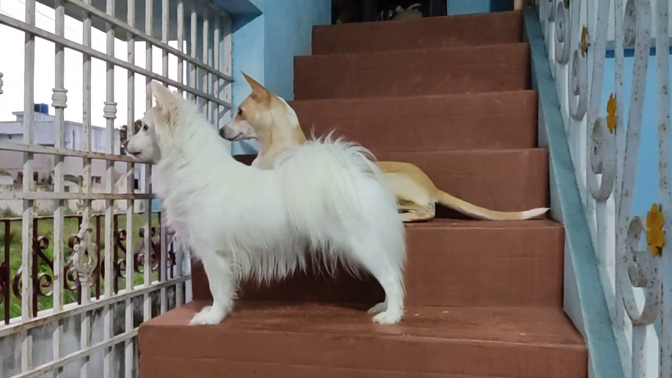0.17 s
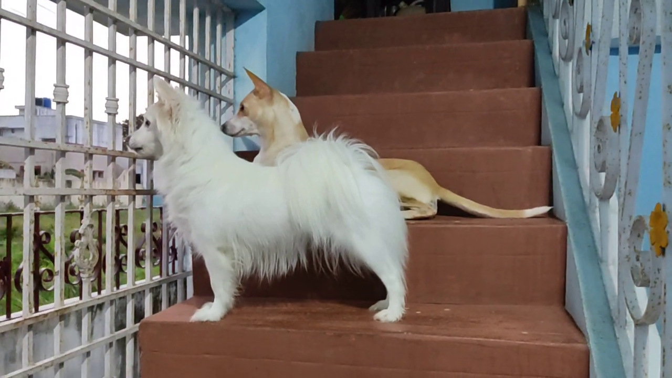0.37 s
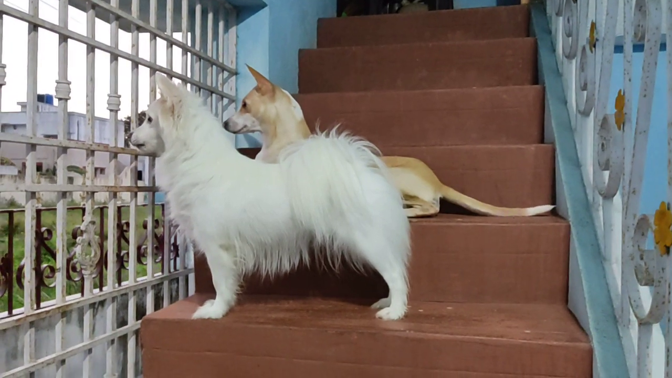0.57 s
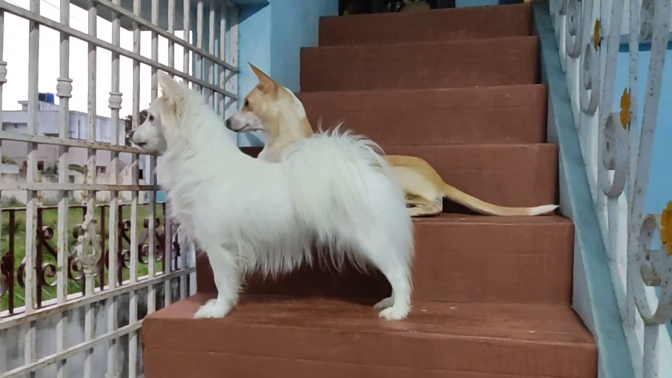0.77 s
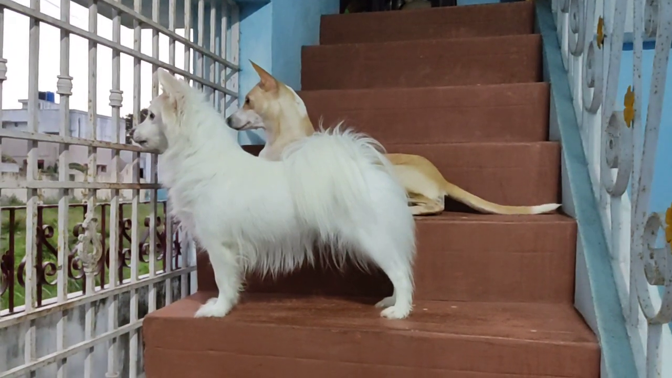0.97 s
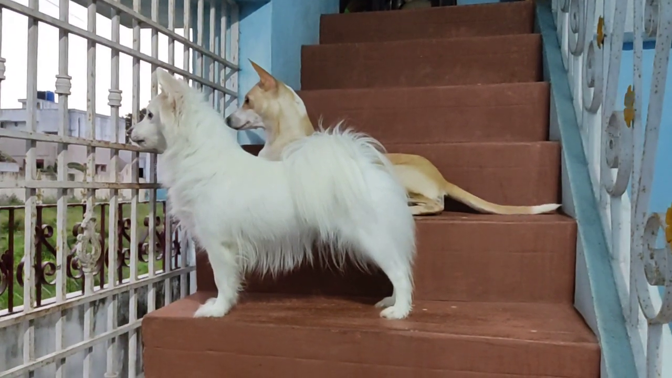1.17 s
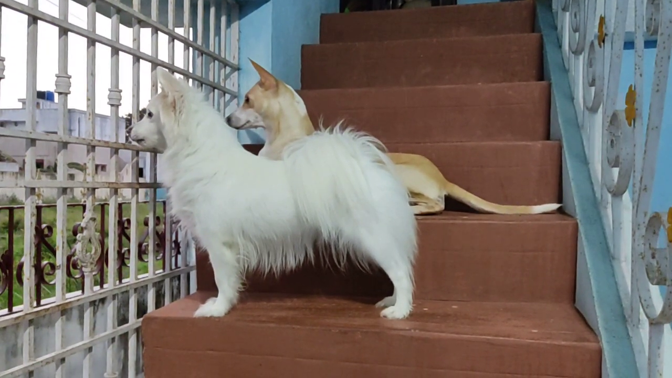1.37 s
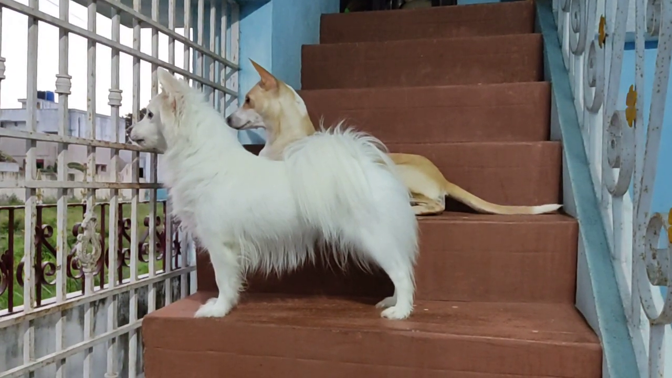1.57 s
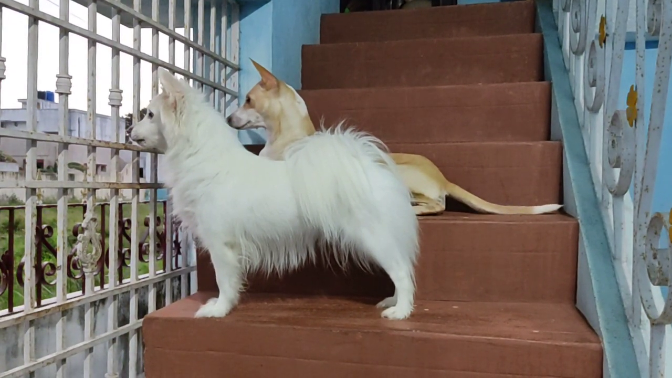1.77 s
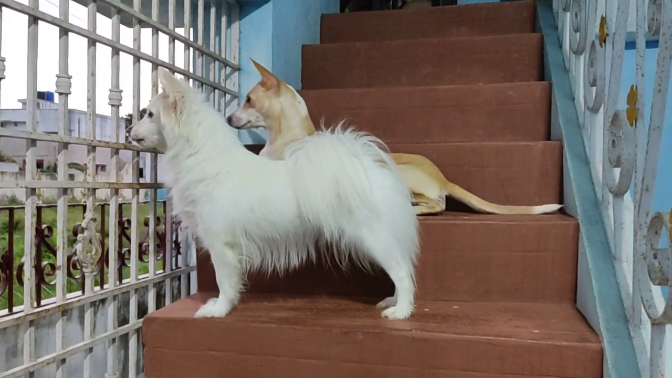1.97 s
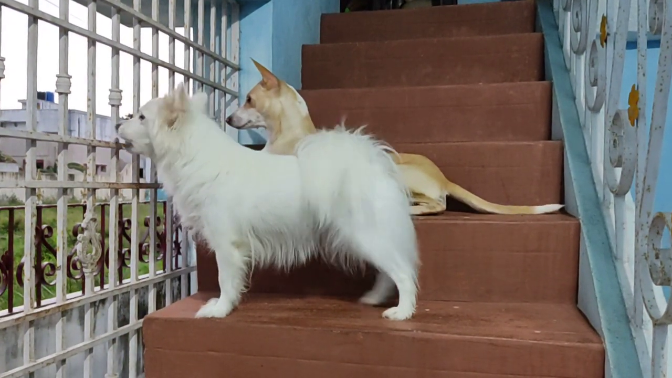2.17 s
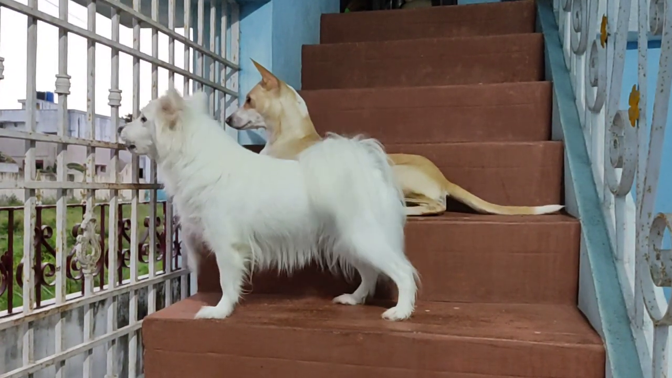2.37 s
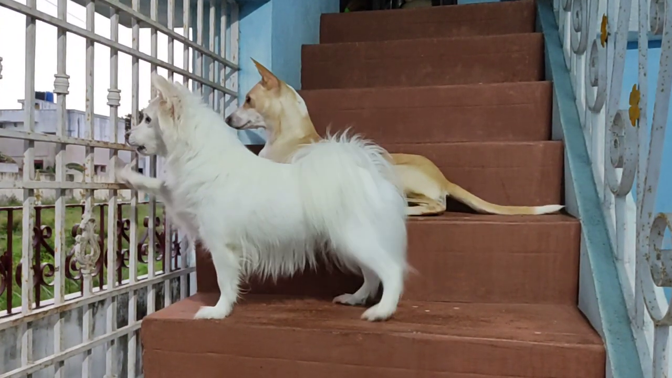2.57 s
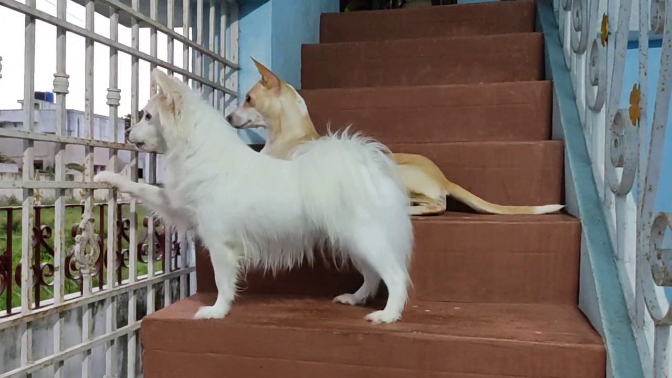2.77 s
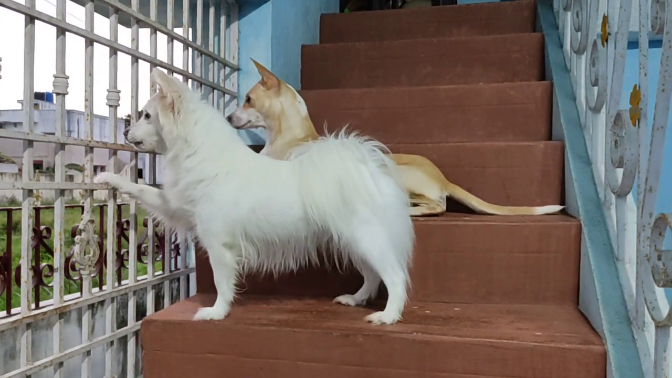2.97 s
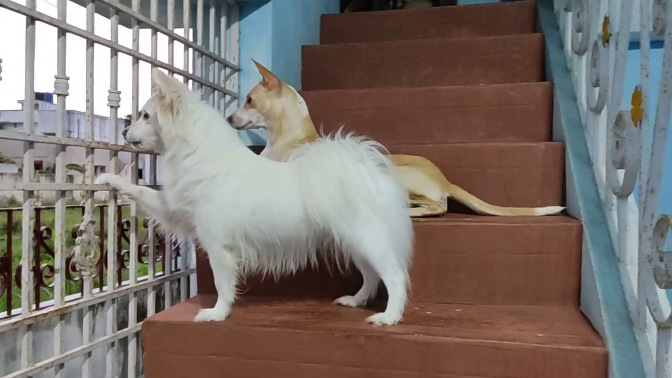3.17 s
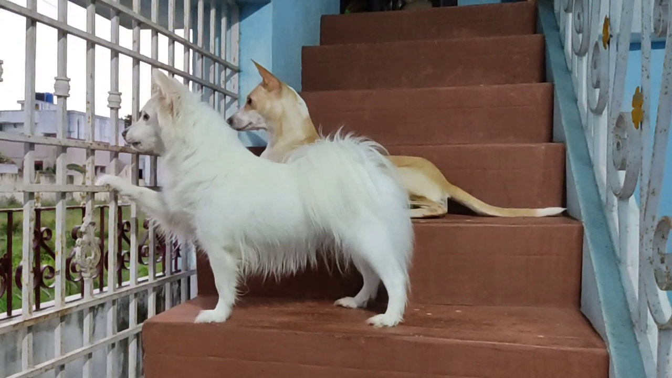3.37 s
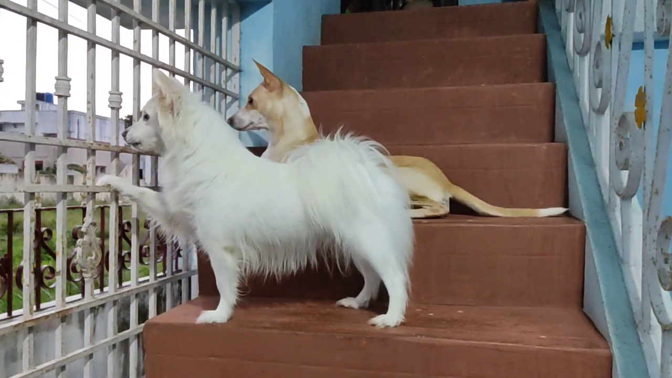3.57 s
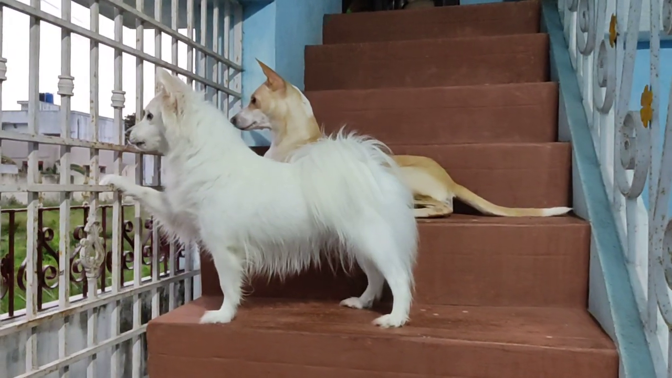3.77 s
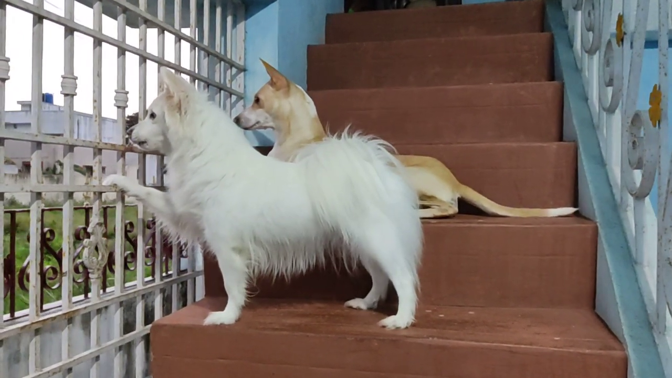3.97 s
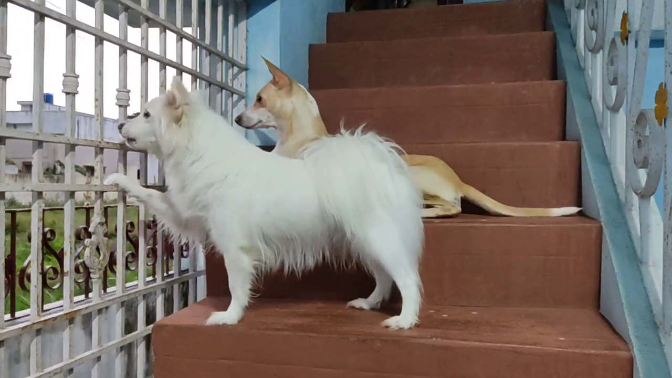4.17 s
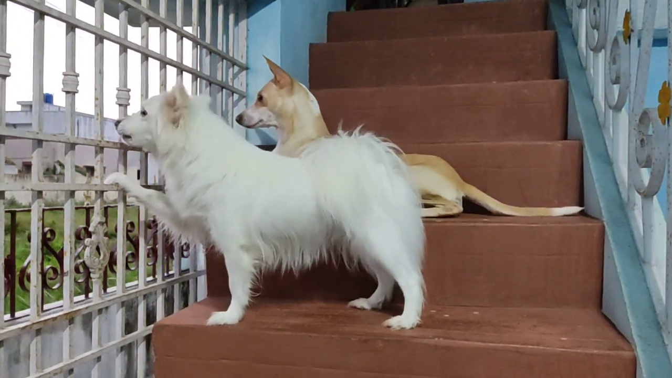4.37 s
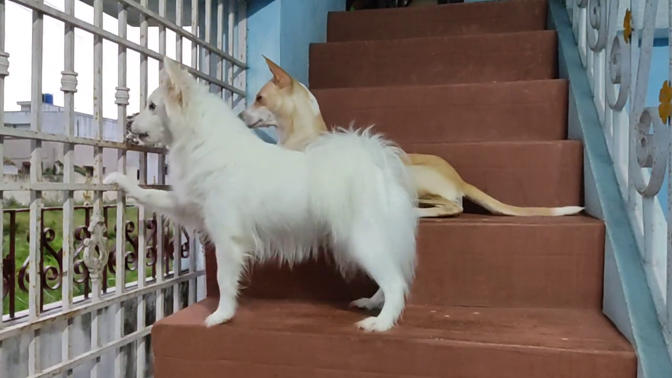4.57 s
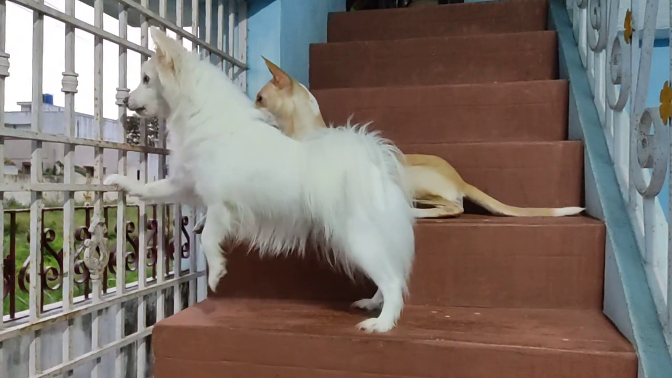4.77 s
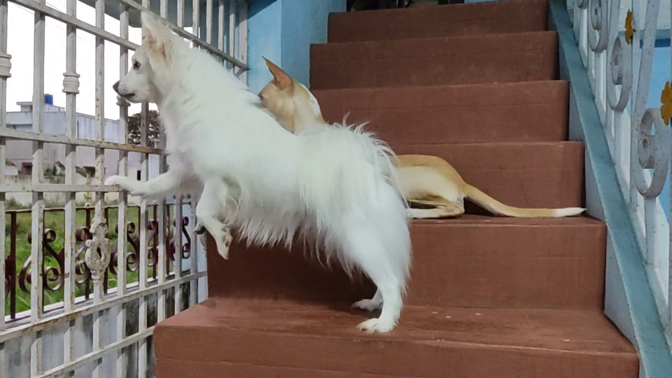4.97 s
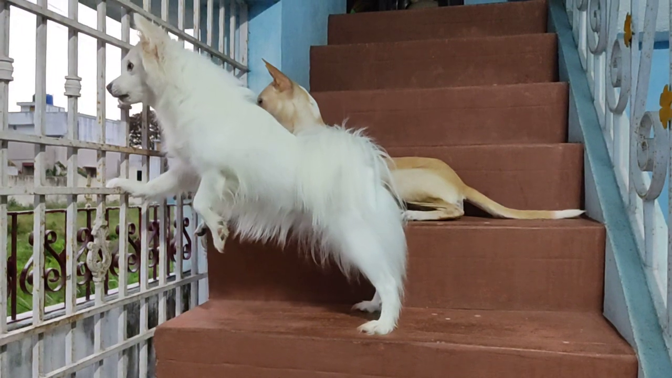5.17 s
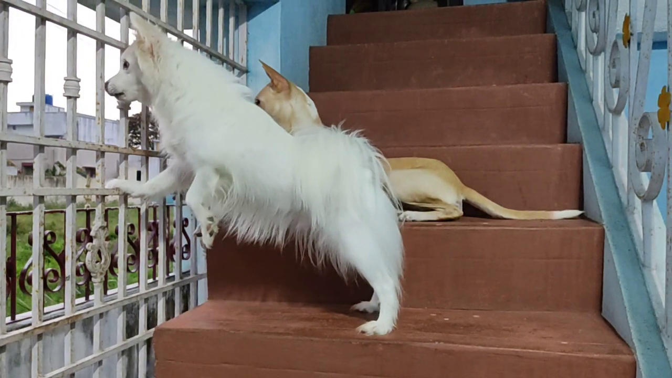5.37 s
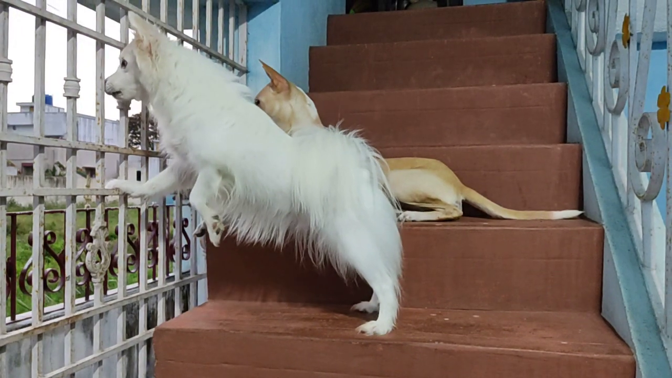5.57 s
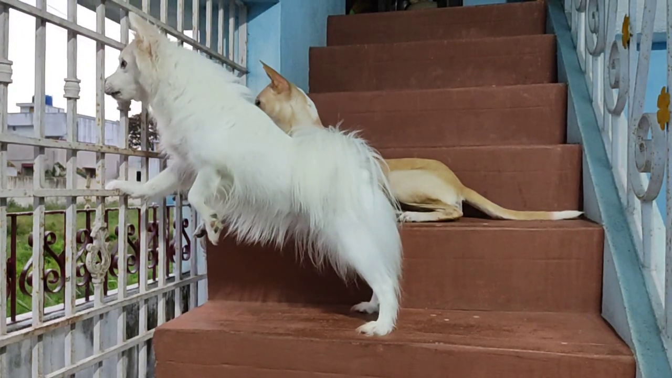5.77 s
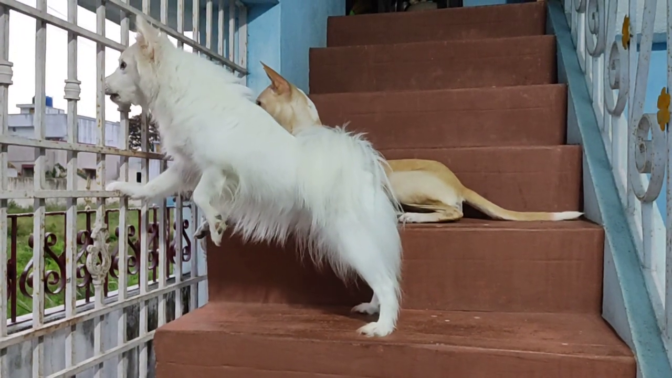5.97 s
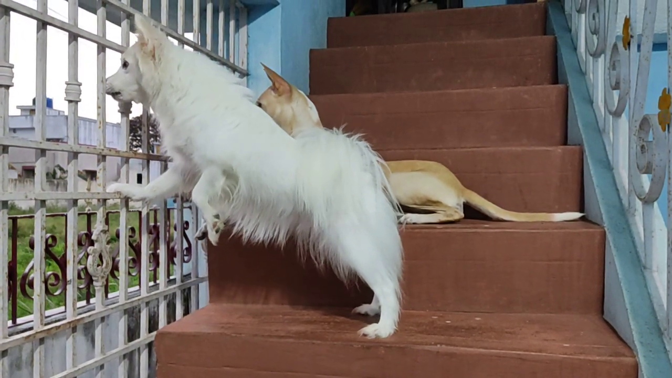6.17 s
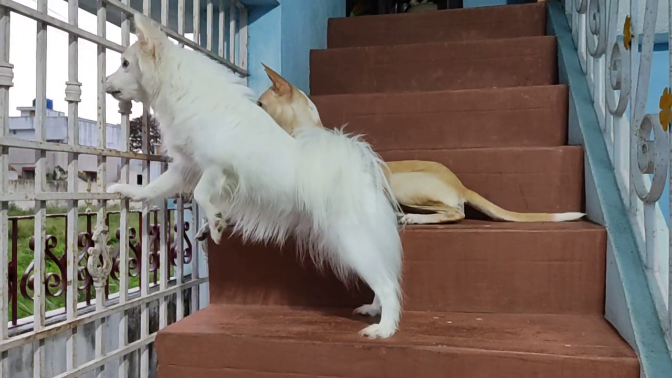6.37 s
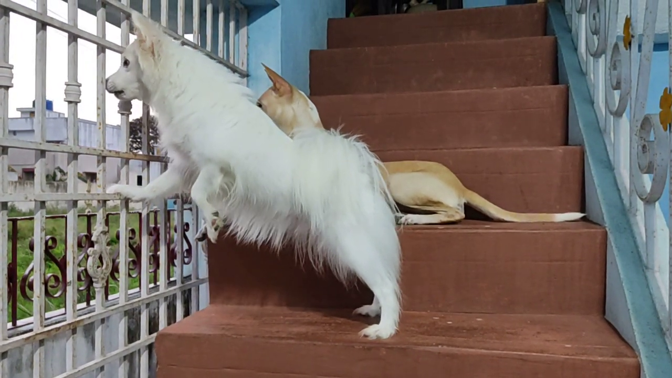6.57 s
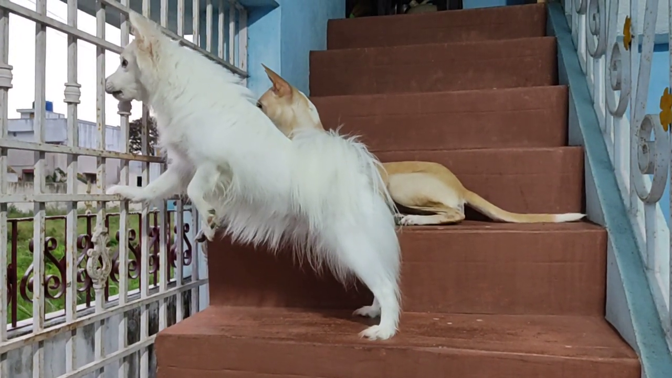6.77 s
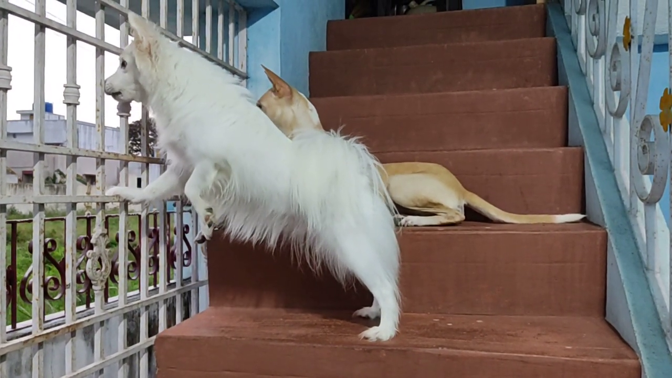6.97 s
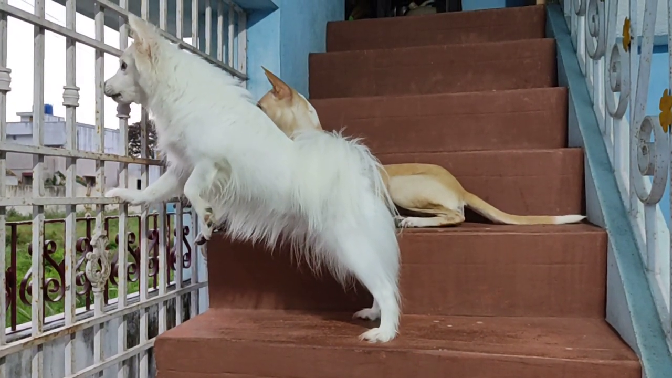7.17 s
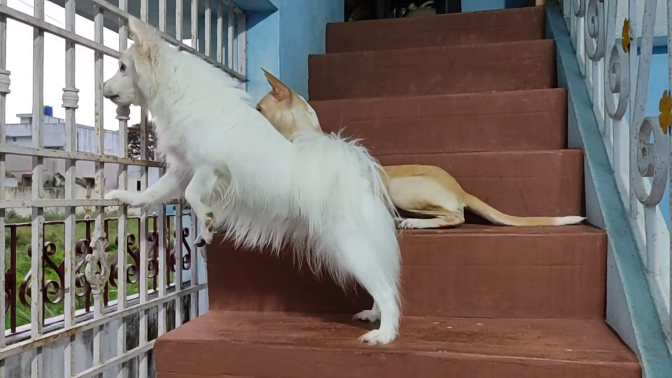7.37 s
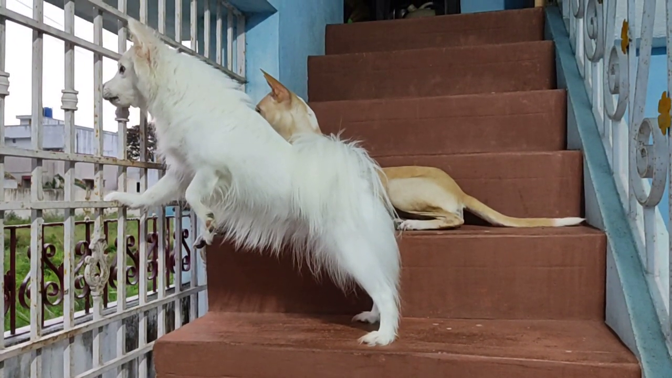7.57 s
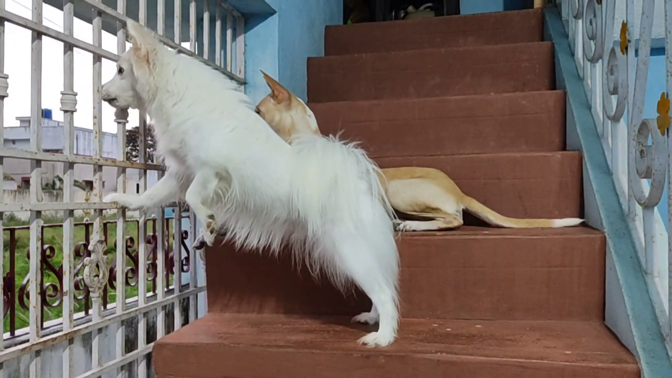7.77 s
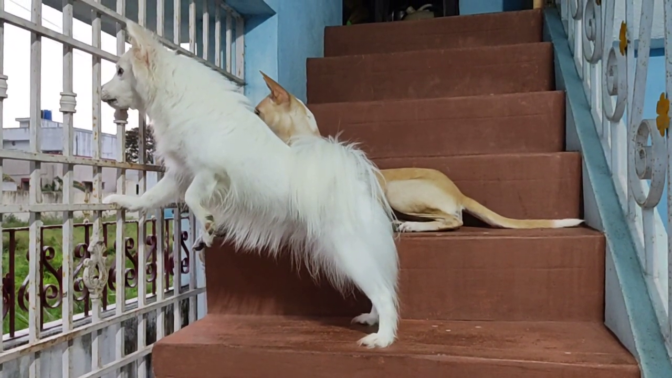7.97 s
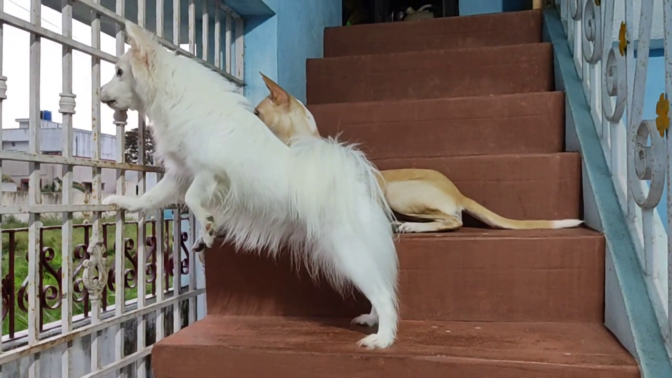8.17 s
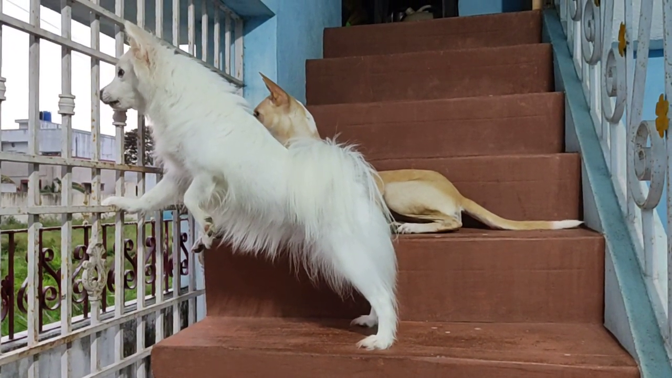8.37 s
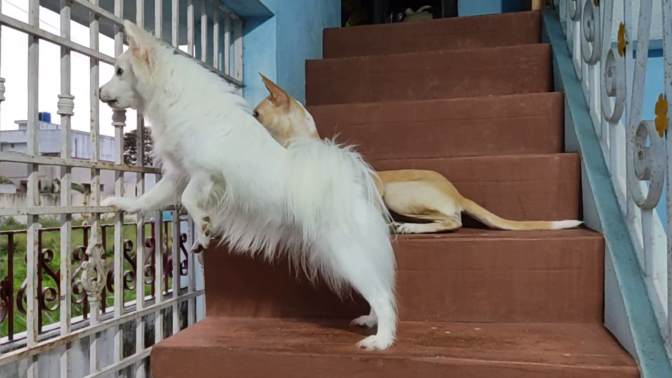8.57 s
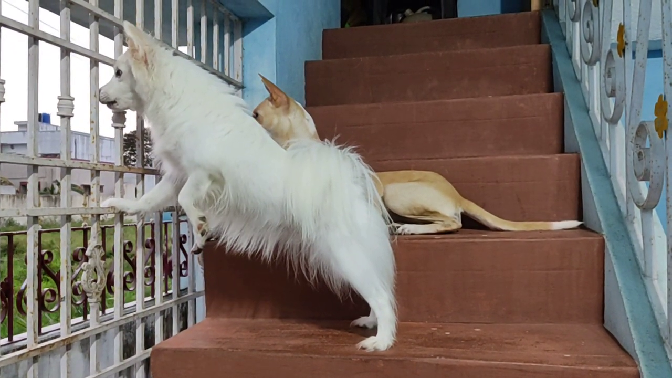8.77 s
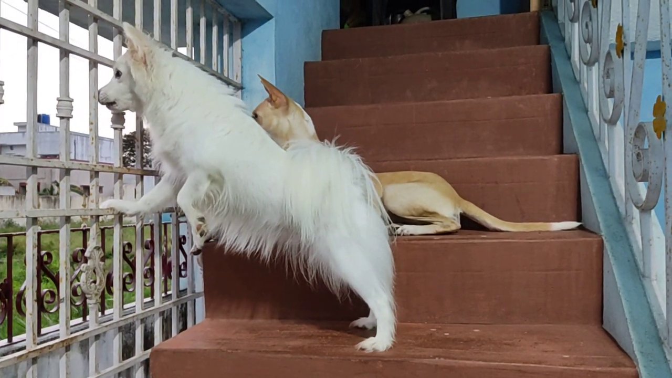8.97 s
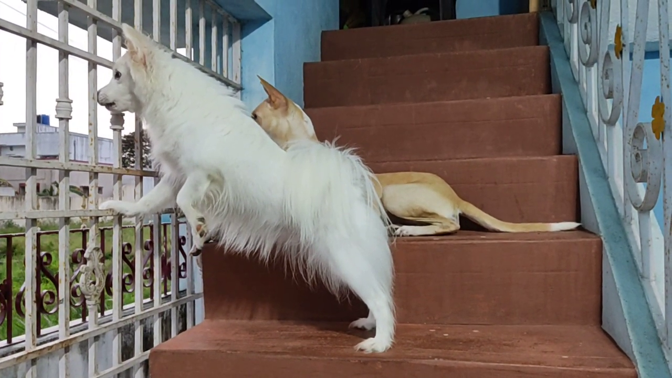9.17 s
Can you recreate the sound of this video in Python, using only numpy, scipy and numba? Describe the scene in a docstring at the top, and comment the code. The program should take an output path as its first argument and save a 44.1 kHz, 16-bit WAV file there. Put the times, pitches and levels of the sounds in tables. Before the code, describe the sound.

A small dog on a barred stairwell porch growls and whines softly, bursting into sharp, high barks in pairs, then one more, and growling on.

```python
"""In a barred stairwell porch a small dog growls and whines, bursts into high, sharp barks, and growls again.
Folds driven as harmonic sums bark through a moving jaw resonance; slack folds rattle body resonances.
Early reflections and a decaying noise tail ring after each sound. A limiter holds the barks down, over
a faint outdoor murmur, a low hum, a thin high hiss, low thumps and short, soft puffs of shaped noise."""
import sys
import numpy as np
from scipy import signal
from scipy.fft import rfft, irfft
from scipy.io import wavfile
from scipy.ndimage import uniform_filter1d, minimum_filter1d
from numba import njit

SR = 44100
rng = np.random.default_rng(int(sys.argv[2]) if len(sys.argv) > 2 else 0)


def output_pcm(signal):
    """Save a mono or channel-first signal as 16-bit PCM at the path in sys.argv[1].

    Samples are clipped to [-1, 1] before scaling.
    """
    pcm = np.clip(np.atleast_2d(signal).T, -1, 1) * 32767
    wavfile.write(sys.argv[1], SR, np.round(pcm).astype(np.int16))


N = 406602
TIME = np.arange(N) / SR
SIDES = np.array([[1], [-1]])  # left, right


def undb(db):
    """Amplitude ratio: 20 dB is a factor of ten in pressure."""
    return 10 ** (np.asarray(db) / 20)


def unit(x):
    """Normalisation by signal power: scale to rms 1."""
    return x / np.sqrt(np.mean(x ** 2) + 1e-18)


def on_log(hz, points):
    """Logarithmic pitch axis: interpolate (hz, value) points along log frequency."""
    f, value = np.transpose(points)
    return np.interp(np.log(np.maximum(hz, 1)), np.log(f), value)


def colour(x, points):
    """Minimum-phase filtering: a causal cepstrum realises the (hz, level_db) response."""
    hz = np.maximum(np.arange(4097) * SR / 8192, 1)
    octaves_below = np.maximum(np.log2(points[0][0] / hz), 0)
    octaves_above = np.maximum(np.log2(hz / points[-1][0]), 0)
    # beyond the end points the response falls by 18 dB per octave
    response_db = on_log(hz, points) - 18 * (octaves_below + octaves_above)
    cepstrum = irfft(np.log(undb(response_db)))
    # fold the cepstrum onto positive time
    cepstrum[1:4096] *= 2
    cepstrum[4097:] = 0
    impulse = irfft(np.exp(rfft(cepstrum)))
    return signal.fftconvolve(x, impulse)[:len(x)]


def walk(rate, size=N):
    """Band-limited randomness: straight glides between `rate` random values a second; spread near 1."""
    step = max(int(SR / rate), 1)
    steps = np.repeat(rng.standard_normal(size // step + 1), step)
    return 1.2 * uniform_filter1d(steps, step)[:size]


def bumps(rows):
    """Gaussian envelopes: gain of bell-shaped swells from rows of (centre_s, length_s, level_db)."""
    return sum(undb(db) * np.exp(-2 * np.minimum(((TIME - s) / length) ** 2, 20))
               for s, length, db in rows)


def gate(t, length, edge):
    """Linear onset and offset: open from 0 to `length` s, with ramps `edge` s long."""
    return np.clip(np.minimum(t, length - t) / edge + .5, 0, 1)


def swell(start, rise, fall, depth_db, edge):
    """Breath pressure: the gain of one push grows by depth_db to its top, sinks again and stops."""
    t = TIME - start
    level_db = np.interp(t, [0, rise, rise + fall], [-depth_db, 0, -depth_db])
    return gate(t, rise + fall, edge) * undb(level_db)


def lag_left(pair, lag_s=0.00029):
    """Travel-time difference: sound reaches the right microphone first."""
    left = np.pad(pair[0], (int(lag_s * SR), 0))[:pair.shape[1]]
    return np.array([left, pair[1]])


def background(left_db=4, apart=1.0, apart_hz=500, hiss_left_db=3, hiss_drift_db=2.5):
    """Spatial coherence: a distant murmur alike on both sides in the bass, with a wavering hum and a thin hiss."""
    # spectrum of the outdoor murmur of air and traffic: hz, level_db
    outdoors = [(15, -16), (25, -1), (70, -6), (104, -8), (130, -10.5), (221, -5.5), (284, -11.5),
                (341, -13), (383, -14), (936, -12.5), (2190, -18), (2690, -19), (4350, -30.5),
                (6000, -30.5), (7800, -107), (13200, -120)]
    # spectrum of the thin hiss: hz, level_db
    hiss_spectrum = [(4500, -18.5), (6300, -13), (7000, -4), (7500, 3), (8000, -1.5), (8800, -2.5),
                     (9700, -11.5), (11000, -32.5), (15500, -37)]
    # swells of the hum: centre_s, length_s, level_db
    hum_swells = [(.75, 0.12, -52), (1.3, 0.17, -50), (7.7, 0.23, -53.5)]
    outdoors_db, hiss_db, hum_db, hum_hz = -49, -48.5, -59, 100

    shared, own = (unit(colour(rng.standard_normal(N), outdoors)) for _ in range(2))
    own = signal.sosfilt(signal.butter(1, apart_hz, "high", fs=SR, output="sos"), own)
    murmur = shared + apart * SIDES * own
    murmur = murmur * undb(outdoors_db + 0.16 * walk(3.01) + SIDES * left_db / 2)

    hiss = np.array([unit(colour(rng.standard_normal(N), hiss_spectrum)) for _ in range(2)])
    hiss = hiss * undb(hiss_db + hiss_drift_db * walk(2.415) + SIDES * hiss_left_db / 2)

    hum_phase = 2 * np.pi * np.cumsum(hum_hz + 3 * walk(23)) / SR
    hum = unit(np.sin(hum_phase) * undb(2 * walk(11.0)))
    hum = hum * (undb(hum_db) + bumps(hum_swells)) * undb(SIDES * left_db)
    return murmur + hiss + hum


def noise_puffs(grain_db=3):
    """Amplitude-modulated noise: short, soft, grainy puffs."""
    # the puffs: centre_s, length_s, level_db
    rows = [(0.036, 0.039, -48.5), (0.474, 0.052, -51.5), (.73, 0.023, -52), (1.624, 0.19, -53.5),
            (3.789, 0.044, -47), (5.04, 0.26, -51.5), (5.633, 0.46, -53), (6.497, 0.25, -51.5),
            (7.165, 0.055, -51), (7.72, 0.12, -50), (8.85, 0.12, -58.5)]
    # spectrum of a puff: hz, level_db
    spectrum = [(200, -7), (400, -7.5), (1050, -3.5), (1500, -10), (2500, -10), (5300, -23.5),
                (7700, -10.5), (9300, -13), (11000, -40.5), (15000, -48)]
    grains = rng.standard_normal(N) * undb(grain_db * walk(400))
    return bumps(rows) * unit(colour(grains, spectrum))


def flapping(flap_hz=35, spread=0.2207):
    """Low-frequency modulation: loose tissue in the throat flaps a few dozen times a second."""
    return np.sin(2 * np.pi * np.cumsum(flap_hz * (1 + spread * walk(30))) / SR)


def rattle(rate_hz, jitter, scatter_db):
    """Pulse excitation: slack folds slap shut at uneven intervals, each time with a different force."""
    cycles = np.cumsum(rate_hz * np.exp(jitter * walk(170))) / SR
    slaps = np.diff(np.floor(cycles), prepend=0)
    return slaps * undb(scatter_db * (2 * rng.random(N) - 1))


def growl(throb=0.46, rattle_hz=152, depth_db=5, edge_s=0.042, snarl_lips_db=-4.5):
    """Source and resonator: an uneven, throbbing rattle rings chest, muzzle and lips in growls and snarls."""
    # rattling growls: start_s, rise_s, fall_s, chest_db, muzzle_db, lip_rasp_db
    growls = [ (1.02, 0.87, 0.25, -51.5, -47, -73), (2.071, 0.071, 0.018, -60, -46.5, -67),
              (3.013, 0.025, 0.42, -56, -38.5, -49.5), (3.458, 0.78, 0.46, -43.5, -42, -59),
              (4.44, 0.11, 0.026, -44.5, -32.5, -30), (5.41, 0.71, 0.068, -43.5, -40.5, -56),
              (6.168, 0.24, 0.088, -35.5, -32.5, -36), (6.5, 0.024, 0.052, -34, -38, -67),
              (7.309, 0.53, 0.12, -39.5, -34.5, -47), (7.955, 0.33, 0.15, -35, -36.5, -47), ]
    # short snarls of the slack folds as a closed mouth opens to bark: centre_s, length_s, level_db
    snarls = [(2.18, 0.021, -28.5), (4.09, 0.022, -30.5), (6.0, 0.043, -32)]
    # resonances of the chest: hz, level_db
    chest_resonance = [(60, -36), (120, -10), (155, 3.5), (215, 6.5), (280, 7.5), (420, -14.5), (560, -4),
                       (700, -12), (1100, -31.5)]
    # resonances of the muzzle: hz, level_db
    muzzle_resonance = [(200, -49.5), (310, -3), (390, 7), (450, 5.5), (520, 3.5), (620, -26), (800, -11),
                        (1200, -52)]
    # resonances of the lips: hz, level_db
    lip_resonance = [(450, -24), (720, 20), (850, 18), (1100, 10.5), (1500, -7), (2400, -10), (4000, -37)]

    chest, muzzle, lips = sum(undb(db)[:, None] * swell(s, rise, fall, depth_db, edge_s)
                              for s, rise, fall, *db in growls)
    snarl = bumps(snarls)
    slaps = rattle(rattle_hz, jitter=.16, scatter_db=6.0) * (1 + throb * flapping())
    return (muzzle * unit(colour(slaps, muzzle_resonance))
            + (chest + snarl) * unit(colour(slaps, chest_resonance))
            + (lips + snarl * undb(snarl_lips_db)) * unit(colour(slaps, lip_resonance)))


def whine(waver=0.0401, octave_db=-22, throb=1.0, depth_db=8, edge_s=0.02):
    """Periodic phonation: a clear nasal tone swells, fades and glides; when unsteady it throbs and wavers."""
    # nasal whines: start_s, rise_s, fall_s, level_db, first_pitch_hz, last_pitch_hz, unsteadiness (0-1)
    whines = [ (1.03, 0.87, 0.32, -44, 404.4, 405, 0.56), (2.134, 0.024, 0.028, -30.5, 418, 395, 0.34),
              (3.04, 0.139, 0.27, -28, 446, 361.6, 0.38), (3.493, 0.26, 0.13, -38, 374, 401, 0.94),
              (3.997, 0.013, 0.045, -31.5, 391.5, 390, 0.49), (5.429, 0.11, 0.19, -32, 409.3, 359.7, 0.71),
              (5.887, 0.082, 0.038, -28.5, 398, 419.4, 0.46), (6.141, 0.095, 0.22, -33.5, 449, 406, 0.93),
              (7.42, 0.12, 0.1, -29, 397.6, 393.4, 0.26), (7.766, 0.046, 0.059, -27, 394.6, 399.4, 0.2), ]
    wobble, flap, out = waver * walk(120), flapping(), 0
    for s, rise, fall, db, first_hz, last_hz, unsteady in whines:
        glide_hz = np.interp(TIME, [s, s + rise + fall], [first_hz, last_hz])
        phase = 2 * np.pi * np.cumsum(glide_hz * (1 + unsteady * wobble)) / SR
        tone = np.sin(phase) + undb(octave_db) * np.sin(2 * phase)
        tone = tone * (1 + throb * unsteady * flap)
        out = out + tone * undb(db) * swell(s, rise, fall, depth_db, edge_s)
    return out


def arch(t, rise, hold, fall, first_hz, top_hz, top_db, core_rough):
    """Tension sets pitch: the folds tighten, hold and let go; level, roughness and overtone loss follow."""
    slack_hz = 484  # pitch as the folds let go
    crown_sag = 0.028  # share of its pitch that a bark lacks at either end of its hold
    attack_db, release_db = 24.5, 17  # drop from the top at the start and at the end
    swell_db_per_s = 15.5  # pressure keeps building until the release
    onset_rough, release_rough = 0.3, 0.55  # roughness that slack folds add
    release_tilt_db = 8  # per octave: the overtones go first when the folds let go

    slack = np.clip(1 - t / rise, 0, 1) ** 1.5
    release = np.clip((t - rise - hold) / fall, 0, 1)
    early_release = np.sqrt(release)
    from_crown = (t - rise - hold / 2) / (hold / 2)
    crown_hz = top_hz * (1 - crown_sag * np.minimum(from_crown ** 2, 1))
    hz = crown_hz - (crown_hz - first_hz) * slack - (crown_hz - slack_hz) * release ** 1.5
    db = top_db + swell_db_per_s * np.minimum(t - rise, hold)
    db = db - attack_db * slack ** 2 - release_db * early_release
    rough = np.clip(core_rough + onset_rough * slack + release_rough * early_release, 0, 1)
    return hz, db, rough, release_tilt_db * early_release


def overtone(k, phase, rough, tilt_db, closed, breathy, smear=1.1, bloom_db=7, break_db=13.5):
    """Harmonic series: overtone k wanders and breaks with roughness; above the third it blooms late."""
    size = len(phase)
    breaks = np.minimum(walk(70.1, size), 1) - .5
    # high overtones stay down until the folds are taut
    db = tilt_db * np.log2(k / 2) - bloom_db * closed * (k > 3)
    db = db + break_db * (rough + breathy) * breaks
    wander = smear * rough * np.sqrt(k / 3) * walk(197.3, size)
    return np.cos(k * phase + wander) * undb(db)


@njit
def resonance(x, hz, width):
    """State-variable resonator: a band-pass with a moving centre, gain 1 there."""
    y, band, low = np.empty(len(x)), 0., 0.
    for i in range(len(x)):
        g, k = np.tan(np.pi * hz[i] / SR), width / hz[i]
        v = (band + g * (x[i] - low)) / (1 + g * (g + k))
        band, low, y[i] = 2 * v - band, low + 2 * g * v, k * v
    return y


def jaw(voice, progress, shut_hz, open_hz, lift_db, width_hz=400.0, lag=0.96, shut_loss=0.42):
    """Formant motion: the opening jaw moves the mouth resonance upward, lighting one overtone after another."""
    opening = np.clip(progress / lag, 0, 1)  # lag: opening time as a multiple of the bark's rise
    hz = shut_hz + (open_hz - shut_hz) * opening ** 2.2
    # the shut jaw lacks this share of the lift
    lift = undb(lift_db * (1 - shut_loss * (1 - opening))) - 1
    return voice + lift * resonance(voice, hz, width_hz)


def bark(row, sub=0.4, air=0.43, loose_tilt_db=1.5, soft_tilt_db=0.5, flutter=0.14, throb_db=5,
         gust_db=5.5, breathy=0.12, flap_depth=0.72, edge_s=0.015):
    """Vocal-fold oscillation: folds scoop into a high arching note that frays, with air torn once a cycle."""
    # spectrum of the air torn at the folds: hz, level_db
    rasp = [(200, -6.5), (600, 1), (1200, 3.5), (1700, -9), (2200, 6), (3000, 4.5), (3700, -3), (4600, 2),
            (6000, 9.5), (7500, 9), (15000, 4.5)]
    (s, rise, hold, fall, first_hz, top_hz, top_db, core_rough,
     shut_hz, open_hz, lift_db, bite_db, treble_db) = row
    start, size = int((s - .01) * SR), int(.3 * SR)
    t = TIME[start:start + size] - s
    hz, db, rough, dull_db = arch(t, rise, hold, fall, first_hz, top_hz, top_db, core_rough)
    jitter = .045 * rough * walk(450, size) + .012 * walk(120, size)
    phase = 2 * np.pi * np.cumsum(hz * (1 + jitter)) / SR

    # less effort and less tension close the folds more gently: the upper harmonics fall away
    slack_db = soft_tilt_db * (db - db.max()) + loose_tilt_db * np.log2(hz / hz.max()) - dull_db
    closed = 1 - np.clip(t / rise, 0, 1) ** 2
    folds = np.cos(phase) + sum(overtone(k, phase, rough, slack_db, closed, breathy)
                                for k in np.arange(2, 20))
    # strong and weak cycles alternate when the voice is rough
    alternation = sub * np.cos(phase / 2) * walk(80.4, size)
    folds *= 1 + rough * (alternation + flutter * walk(350, size))

    # even a clear bark is a little breathy
    turbulence = air * 3 * (rough + breathy) * colour(rng.standard_normal(size), rasp)
    turbulence = turbulence * (1 + np.cos(phase)) * undb(slack_db)

    # a rough bark comes out in uneven bursts, chopped by loose tissue
    uneven_db = rough * (throb_db * walk(131.3, size) + gust_db * walk(65.6, size))
    voice = jaw(folds + turbulence, t / rise, shut_hz, open_hz, lift_db)
    voice = voice * gate(t, rise + hold + fall, edge_s) * undb(db + uneven_db)
    voice = voice * (1 + flap_depth * rough * flapping()[:size])
    # the lips set how much bite and treble get out
    lip_shape = [(20, 0), (2800, 0), (3600, bite_db), (5800, bite_db), (7500, treble_db), (20000, treble_db)]
    return np.pad(colour(voice, lip_shape), (start, N - start - size))


def barking():
    """Linear filtering: one fixed spectral envelope colours every bark."""
    # barks: start_s, rise_s, hold_s, fall_s, first_pitch_hz, top_pitch_hz, level_db, roughness (0-1),
    # shut_mouth_hz, open_mouth_hz, mouth_lift_db, bite_db (about 4-6 kHz), treble_db
    rows = [ (2.176, 0.042, 0.07, 0.05, 611, 884.6, -4.5, 0.45, 1150, 2600, 9.5, 6.5, 5),
            (2.361, 0.059, 0.04, 0.0181, 579.6, 813, -2.5, 0.26, 2050, 2310, 12, -1.5, 1.5),
            (4.092, 0.05, 0.079, 0.063, 620.2, 925.5, -3, 0.49, 1150, 2700, 11.5, 8, 5),
            (4.296, 0.042, 0.044, 0.054, 689, 854, -0.5, 0.16, 2000, 2500, 10.5, 7.5, 0),
            (4.48, 0.04, 0.0505, 0.03, 540.5, 648.3, -11.5, 0.5, 1150, 1270, -1, -18, -14),
            (5.988, 0.066, 0.032, 0.0118, 500.3, 783.2, -2, 0.04, 1050, 2280, 15, -2, 1.5), ]
    # overall tone colour of the barks, uneven in the treble: hz, level_db
    tone_colour = [(150, -30.5), (420, -9.5), (680, -3), (860, 1), (1100, -11.5), (1650, -22),
                   (1950, -22.5), (2400, -22), (3200, -33), (4300, -26), (4950, -34), (5450, -30),
                   (6100, -37), (6600, -33), (7000, -32), (7420, -22.5), (7950, -37), (8400, -33),
                   (8900, -26), (9700, -34.5), (10500, -43), (15500, -52.5)]
    return colour(sum(bark(row) for row in rows), tone_colour)


def thumps(left_db=6):
    """Pressure noise: low thumps under the loudest barks, like puffs of air on the microphone."""
    # the thumps: centre_s, length_s, level_db
    rows = [(2.335, 0.085, -28.5), (4.265, 0.069, -30), (4.435, 0.052, -29)]
    # spectrum of a thump: hz, level_db
    spectrum = [(12, 2), (25, -12), (50, -24.5), (100, -30), (200, -42)]
    return bumps(rows) * unit(colour(rng.standard_normal(N), spectrum)) * undb(SIDES * left_db / 2)


def quick_puffs(grain_db=3, attack_s=0.0095, decay_s=0.048):
    """Exponential decay: short, soft puffs of noise with a quick onset."""
    # the puffs: start_s, level_db
    rows = [(8.822, -39), (9.058, -44.5)]
    # spectrum of a puff: hz, level_db
    spectrum = [(200, -7), (420, 3), (700, -9), (1020, 4), (1500, -7), (2700, -12), (4500, -24),
                (6000, -19), (7700, -5), (9300, -14), (11000, -34), (15000, -45)]
    envelope = 0
    for s, db in rows:
        t = TIME - s
        onset = np.interp(t, [0, attack_s], [0, 1])
        envelope = envelope + undb(db) * onset * np.exp(-np.maximum(t - attack_s, 0) / decay_s)
    grains = rng.standard_normal(N) * undb(grain_db * walk(400))
    return envelope * unit(colour(grains, spectrum))


def standing_wave(x):
    """Room mode: a standing wave between the walls favours one low note and holds it a little."""
    # the mode: hz, width_hz, lift_db
    mode = (393, 9.4, 0.27)
    hz, width_hz, lift_db = mode
    ringing = signal.lfilter(*signal.iirpeak(hz, hz / width_hz, fs=SR), x)
    return x + (undb(lift_db) - 1) * ringing


def taps(rows):
    """Specular reflection: a second of stereo impulses from rows of (delay_s, left_gain, right_gain)."""
    out = np.zeros((2, SR))
    for delay, left, right in rows:
        out[:, int(delay * SR)] += left, right
    return out


def treble_response(span_s=0.002366, scatter_db=-5, left_db=6):
    """Interference: a random, short treble response makes the overtones uneven."""
    size = int(span_s * SR)
    treble = signal.butter(2, 3000, "high", fs=SR, output="sos")
    response = signal.sosfilt(treble, rng.standard_normal((2, SR)))
    response = response * (np.arange(SR) < size)
    return response * undb(scatter_db + SIDES * left_db / 2) / np.sqrt(size)


def porch(x, wet_db, left_db, wet_left_db, build=0.00052):
    """Reverberation: direct sound, a few echoes, then a dense decaying tail that differs at two microphones."""
    # decay time of the tail in each band: hz, t60_s
    band_t60 = [(150, 0.29), (400, 0.72), (800, 0.72), (2400, 0.53), (3100, 0.32), (5000, 0.27),
                (9000, 0.51), (15000, 0.08)]
    # distinct reflections from the near walls: delay_s, left_gain, right_gain
    walls = [(.0016, 0.22, -0.0084), (.0051, 0.17, -0.031), (.0093, 0.27, -0.36), (0.015, 0.55, -0.027)]
    # dull echoes from house fronts across the yard: delay_s, left_gain, right_gain
    echoes = [(.078, 0.12, 0.13), (.094, 0.22, 0.22), (0.119, 0.1, -0.17), (.205, 0.066, 0.049)]
    # response of the house fronts: hz, level_db
    echo_response = [(20, 1.5), (900, 2), (2400, -8), (3500, -11), (15000, -18)]

    t = np.arange(SR) / SR
    octave = np.log2(np.arange(SR // 2 + 1) + 1)
    centres = np.log2(np.array(band_t60)[:, 0])
    noise, tail = rfft(rng.standard_normal((2, SR))), 0
    # each band decays by 60 dB in its own t60
    for share, (_, t60) in zip(np.eye(len(centres)), band_t60):
        band = np.interp(octave, centres, share)
        tail = tail + irfft(noise * band, SR) * np.exp(-np.log(1000) * t / t60)
    tail = tail * (1 - np.exp(-t / build)) * undb(wet_db + SIDES / 2 * wet_left_db) * np.sqrt(20 / SR)

    far = np.array([colour(side, echo_response) for side in taps(echoes)])
    early = treble_response() + taps(walls) + far
    early[:, 0] += 1  # direct sound
    response = lag_left(early * undb(SIDES / 2 * left_db)) + tail
    return signal.fftconvolve(x[None], response, axes=1)[:, :N]


def scene():
    """Superposition: the dog and the soft puffs sound in the porch; the background comes in through the bars."""
    # the right microphone is shaded from a bark's bite: hz, level_db
    right_shade = [(20, -4), (2600, 0.5), (4200, -6.5), (5800, -2), (7500, 1), (20000, -7)]
    left, right = porch(barking(), wet_db=-2.5, left_db=-1.5, wet_left_db=1, build=0.0069)
    barks = np.array([left, colour(right, right_shade)])
    low_voice = porch(standing_wave(growl() + whine()), wet_db=-5.0, left_db=8.5, wet_left_db=10.0)
    grainy = porch(noise_puffs(), wet_db=6.0, left_db=-7.0, wet_left_db=8.0)
    quick = porch(quick_puffs(), wet_db=-4.5, left_db=0.5, wet_left_db=20)
    return lag_left(background()) + grainy + low_voice + barks + thumps() + quick


@njit
def follow(x, release):
    """Envelope detection: a peak follower jumps up at once and sinks back slowly."""
    out, e = np.empty(len(x)), 0.
    for i in range(len(x)):
        e = max(x[i], e * (1 - release))
        out[i] = e
    return out


def record(dry, ceiling=0.98, release_s=0.043, lopsided=0.05, top_hz=15750):
    """Limiting and even-order distortion: look-ahead gain holds barks down; a lopsided microphone adds thumps."""
    peak = follow(np.abs(dry).max(axis=0), 1 / (release_s * SR))
    gain = np.minimum(1, ceiling / (peak + 1e-9))
    # the gain begins to drop 64 samples ahead of a peak
    gain = uniform_filter1d(minimum_filter1d(gain, size=65), size=65)
    held = dry * gain
    # squaring the pressure leaves a slow, one-sided push
    thump = signal.sosfilt(signal.butter(1, [20, 70], "band", fs=SR, output="sos"), held ** 2)
    low_pass = signal.ellip(8, .2, 80, top_hz, fs=SR, output="sos")
    return signal.sosfilt(low_pass, held + lopsided * thump)


dry = scene()
out = record(dry)
output_pcm(out)
```